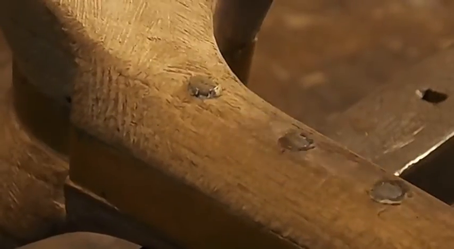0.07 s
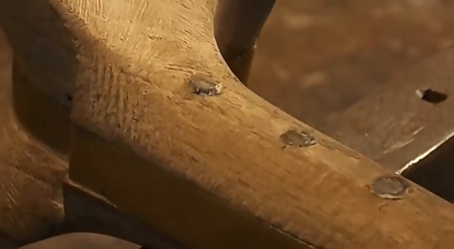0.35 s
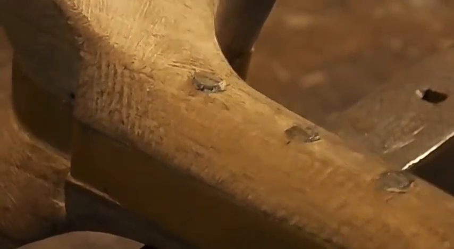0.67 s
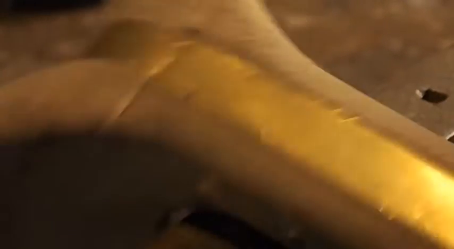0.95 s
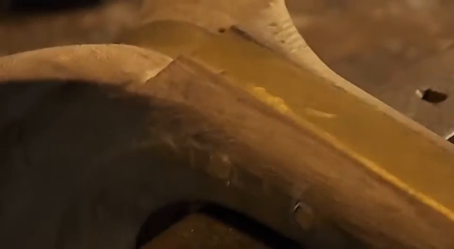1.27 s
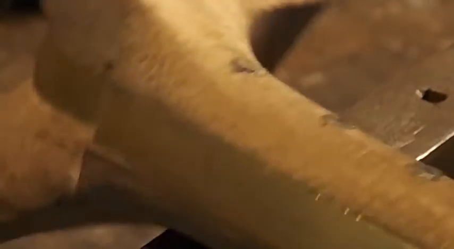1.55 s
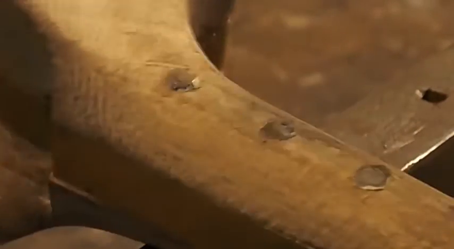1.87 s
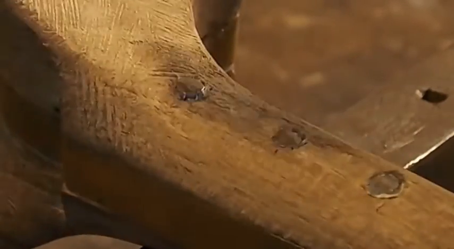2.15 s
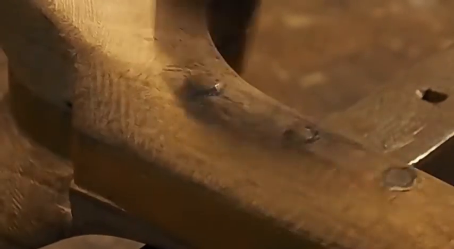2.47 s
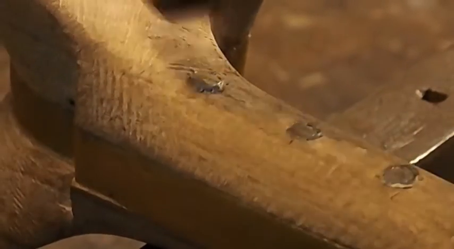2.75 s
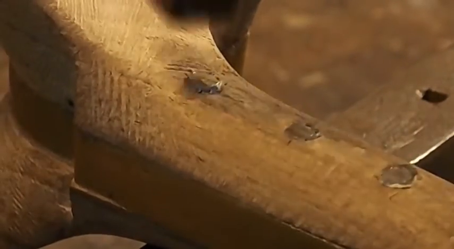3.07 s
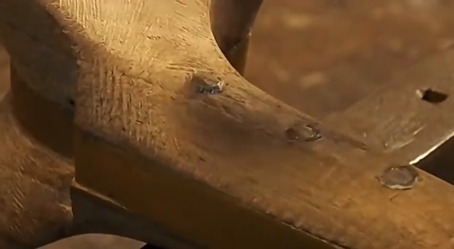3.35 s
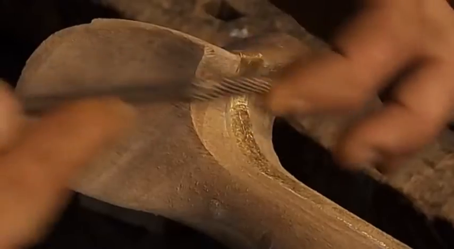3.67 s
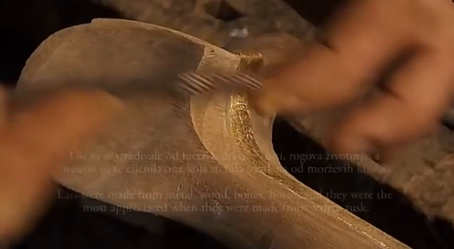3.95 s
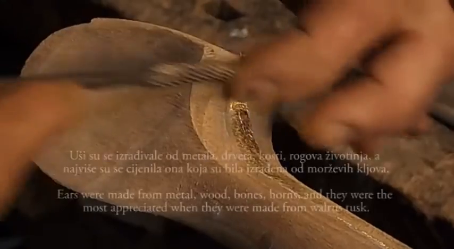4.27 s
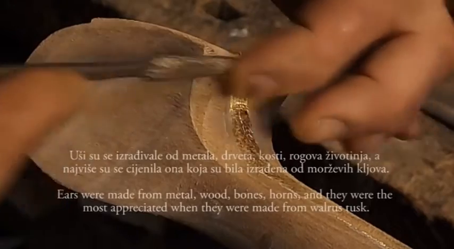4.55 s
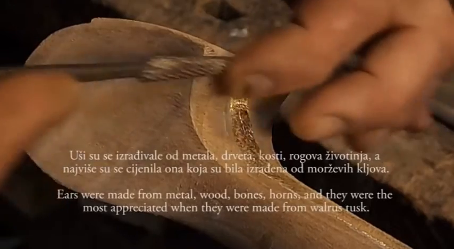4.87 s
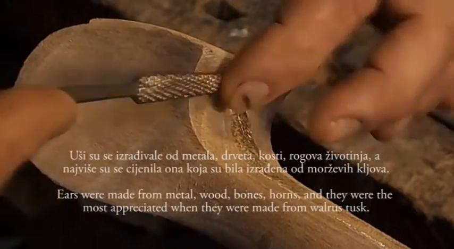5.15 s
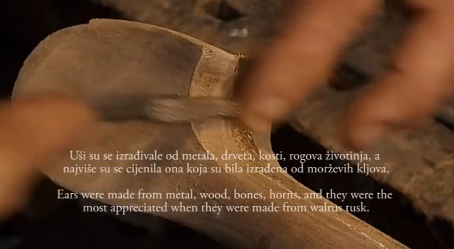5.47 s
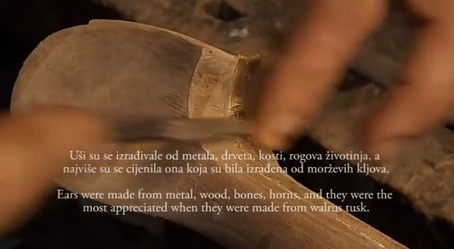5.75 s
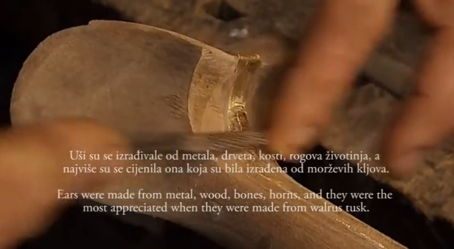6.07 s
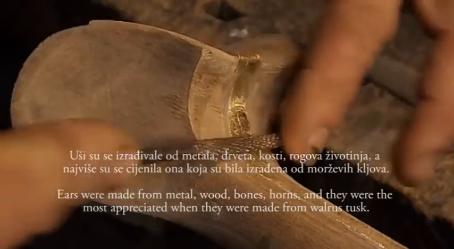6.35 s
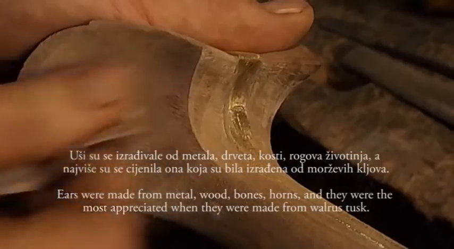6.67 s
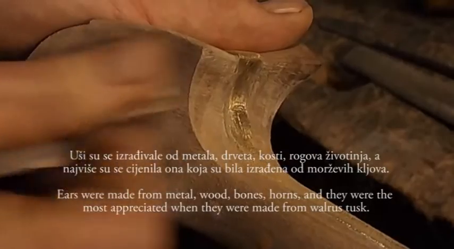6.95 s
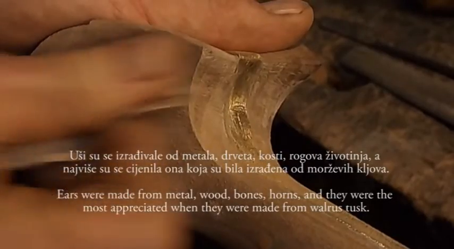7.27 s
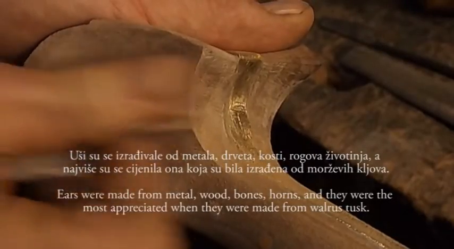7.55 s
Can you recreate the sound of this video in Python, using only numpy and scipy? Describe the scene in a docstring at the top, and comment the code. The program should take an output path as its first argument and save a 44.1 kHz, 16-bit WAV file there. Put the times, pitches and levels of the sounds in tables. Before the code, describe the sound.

In a small woodshop, a hammer strikes nails in two hard bouts, followed by soft rasp strokes and brisk, hissing sandpaper.

```python
"""A woodworker's shop. Hard hammer blows on nails in wood fill the small room and drive a limiter,
which turns the loudest moments down. Between the two bouts the piece is turned over on the bench.
The hammering is cut off, then a small rasp runs lightly to and fro: its teeth tear fibres and the
held wood drones. Last come quicker, brighter strokes of sandpaper, whose grit hisses and whistles."""
import sys
import numpy as np
from scipy import signal
from scipy.fft import rfft, irfft, next_fast_len
from scipy.io import wavfile
from scipy.ndimage import uniform_filter1d, minimum_filter1d, map_coordinates

SR = 44100
rng = np.random.default_rng(int(sys.argv[2]) if len(sys.argv) > 2 else 0)


def transcribe(u):
    """Save the signal u as a 16-bit wav file named by the first command-line argument.

    u: samples, shape (n,) or (channels, n), limited to [-1, 1]; the rate is SR.
    q: integer samples, one column per channel.
    """
    v = np.clip(np.atleast_2d(u).T, -1, 1)
    q = np.round(v * 32767).astype(np.int16)
    wavfile.write(sys.argv[1], SR, q)


N = 339570

HAMMER_END_S, RASP_END_S = 3.487, 6.73


# The tone of steel meeting the nail. Each row: frequency in Hz, level in dB.
CRACK_TONE = [(30, -32), (170, -16.5), (650, -12), (1700, -7), (2150, -11.5), (2650, 2.5), (3900, 6.5),
              (5200, -13.5), (9000, -3.5), (12000, -8), (16000, -11)]
# The hammer blows. Each row: start in seconds, force in dB, extra level of the crack in dB.
HAMMER_BLOWS = [(-.112, -4.5, 0), (0.1473, -1, -5), (0.409, -0.5, 2), (2.421, -5, -4.5), (2.6747, -2, 3),
                (2.9267, 0, -1.5), (3.18, 0, -2), (3.4321, 0, -3)]

def hammer():
    """A short crack, then after a few milliseconds the bang of bench and room, nearly alike each time."""
    out, t = np.zeros(N), np.arange(SR) / SR
    shared_bang = room_bang()
    contact = coloured(rng.standard_normal(SR), CRACK_TONE)
    arrival = np.interp(t, [0, .004, .006], [.3, .45, 1])
    for start, force_db, crack_db in HAMMER_BLOWS:
        bang = amp(-9) * shared_bang + amp(-13.5) * room_bang() + ringing(t)
        crack = amp(crack_db + 3.5) * contact * np.exp(-(t / 0.0018) ** 2)
        add(out, amp(force_db) * (bang * arrival + crack), start)
    cut_off = np.clip((HAMMER_END_S - clock()) / 0.0024, 0, 1)
    return out * cut_off


# The tone of the struck piece and bench in the room. Each row: frequency in Hz, level in dB.
BANG_TONE = [(30, -52.5), (138, -34), (239, -20.5), (295, -17.5), (486, -2), (684, -6.5), (1130, -4.5),
             (1590, -10.5), (2290, -9), (2900, -13.5), (4800, -13.5), (6210, -23.5), (8700, -12.5),
             (10500, -21.5), (13000, -15.5), (16000, -28)]
# How long the shop echoes. Each row: frequency in Hz, seconds to fade by 60 dB.
ECHO_TIMES = [(60, 0.78), (160, 0.61), (420, 0.47), (1100, 0.47), (2900, 0.42), (7700, 0.34), (15000, 0.23)]

def room_bang():
    """One second of the room's answer to a blow; the treble dies first."""
    hz, t, spectrum = signal.stft(coloured(rng.standard_normal(SR), BANG_TONE), SR, nperseg=512)
    fade = amp(-60 * t / along(ECHO_TIMES, hz)[:, None])
    return signal.istft(spectrum * fade, SR, nperseg=512)[1][:SR]


# The notes of the struck wood and nail. Each row: pitch in Hz, relative level in dB.
STRUCK_NOTES = [(246, -17), (379, -10), (486, -2.5), (540, -5), (735, -2), (924, -8.5), (1002, -7.5),
                (1106, 0), (1168, 1.5), (1330, -9.5), (1394, -2), (1992, -9), (2032, -10.5), (2228, -6),
                (2275, -2), (2490, -8.5), (2760, -4.5), (3019, -12.5), (3411, -5.5), (3930, -9),
                (4468, -12), (4838, -8), (8387, -19.5), (9540, -16)]

def ringing(t):
    """The steel head gives a thin note; wood and nail ring on in the room, blurred by its echoes."""
    head_hz, head_fade_s = 13708, .62
    out = amp(-41 - 60 * t / head_fade_s) * np.sin(2 * np.pi * head_hz * t)
    drift_times = np.arange(101) / 100
    for hz, db in STRUCK_NOTES:
        phases = rng.uniform(0, 2 * np.pi) + np.cumsum(rng.normal(0, 0.46, len(drift_times)))
        level = amp(db - 20 + rng.normal(0, 1.1) - 60 * t / along(ECHO_TIMES, hz))
        out += level * np.sin(2 * np.pi * hz * t + np.interp(t, drift_times, phases))
    return out


# The rasp going to and fro. Each row: start in seconds, pull level in dB, push level in dB.
RASP_STROKES = [(3.478, -50, -50), (3.787, -53.5, -47), (4.126, -62, -49.5), (4.44, -56.5, -55),
                (4.759, -54.5, -52), (5.103, -52, -47), (5.452, -56.5, -50), (5.774, -55, -56),
                (6.108, -53, -56), (6.428, -54.5, -54)]
# The tone of the scraping. Each row: frequency in Hz, level in dB.
RASP_TONE = [(100, -38), (280, -31.5), (450, -10), (650, -10.5), (850, -0.5), (1300, -6.5), (2300, -2.5),
             (3500, -5.5), (5000, -11), (5900, -11.5), (8000, -10), (11000, -13.5), (16000, -14.5)]
# The notes that ring in the scraping. Each row: pitch in Hz, width in Hz, level in dB.
RASP_NOTES = [(527, 27, -2), (792, 14, -4.5), (887, 17, 3), (1107, 20, 4.5), (1554, 75, -5.5),
              (1804, 21, 0.5), (2055, 27, -4), (2300, 28, -7.5), (4700, 430, -14.5), (7000, 340, -16.5),
              (7930, 180, -12)]

def rasp():
    """Teeth tear fibres as fast as the hand moves, and sound duller on the push."""
    t = clock()
    starts, pull_db, push_db = np.transpose(RASP_STROKES)
    speed, moments = strokes(starts, RASP_END_S, swing=(0.23, 0.51, 0.75))
    stroke_db = by_stroke(moments, pull_db, push_db)
    easing_db = 2.5 * (t - starts[0])  # the hiss falls as the hand eases
    teeth_db = -49 - easing_db - 2.5 * by_stroke(moments, 0, 1)
    bite = scratches(500 + 3500 * speed, spread_db=3.5, hiss_db=0.5) * amp(0.83 * wobble(60))
    voiced = coloured(bite, RASP_TONE) + amp(-3.5) * resonate(bite, RASP_NOTES)
    low, high = split(wood_grain(voiced, depth_db=2.5), edge_hz=2300)
    scrape = amp(stroke_db) * low * (.12 + 0.88 * speed ** 1.08) + amp(teeth_db) * high * speed ** 1.47
    drone = wood_drone(bite, speed, stroke_db, average_db=np.mean([pull_db, push_db]))
    working = (t > HAMMER_END_S) * np.clip((RASP_END_S - t) / .03, 0, 1)
    return (in_room(working * scrape, wet_db=-7, lowest_hz=258)
            + in_room(working * drone, wet_db=-15.5, lowest_hz=90))


# The low notes of the held piece. Each row: pitch in Hz, width in Hz, level in dB.
HELD_WOOD_NOTES = [(118, 18, -12.5), (338.6, 9, 2), (360.2, 7.3, 8.5), (413.5, 8, -11), (523, 6.3, -19)]

def wood_drone(bite, speed, stroke_db, average_db):
    """The held piece hums under the rasp; a firm stroke also brings out its upper notes."""
    body = resonate(rng.standard_normal(N), HELD_WOOD_NOTES)
    damped = np.clip((clock() - 5.3) / 0.27 + .5, 0, 1)  # the hum is damped late in the bout
    hum_db = -60.5 + 0.42 * (stroke_db - average_db) - 4 * damped
    hum = amp(hum_db) * (0.67 + 0.5 * speed) * body
    return hum + amp(stroke_db - 10.5) * speed * resonate(bite, HELD_WOOD_NOTES[3:])


# The tone of grit on wood. Each row: frequency in Hz, level in dB.
SANDING_TONE = [(100, -49), (260, -23), (353, -20), (509, -11), (777, -14), (1200, -10), (1500, -5.5),
                (1900, -5.5), (2800, -2.5), (4500, -3), (5300, -4), (6200, -2.5), (8270, -2.5), (11500, -7),
                (16000, -10.5)]

def sandpaper():
    """Dense grit rubs and hisses to a steady beat, brighter with speed, louder as the hand leans in."""
    start_s, cycle_s = 6.692, 0.3072
    starts = start_s + cycle_s * np.arange(4)
    speed, moments = strokes(starts, starts[-1] + cycle_s, swing=(.295, .48, 0.68))
    age = np.maximum(clock() - start_s, 0)
    back = by_stroke(moments, 0, 0.84)  # high on the way back
    rub = amp(-40 + 3.5 * age + 2.5 * back)
    hiss = amp(-35 + age - 2.5 * back)
    grit = scratches(2000 + 9000 * speed, spread_db=4, hiss_db=3) * amp(0.76 * wobble(90))
    low, high = split(wood_grain(coloured(grit, SANDING_TONE), depth_db=2), edge_hz=2300)
    out = rub * low * speed ** 0.25 + hiss * high * speed ** 1.54
    out += amp(-27.5) * rub * speed ** .5 * resonate(grit, HELD_WOOD_NOTES[1:])
    out += amp(-33 + 6 * age - 5.5 * back) * paper_whistle(speed, turns=moments[:, 2:3])
    return in_room(out, wet_db=-10.5, lowest_hz=228)


def paper_whistle(speed, turns):
    """Just before and after each far turn the paper grips with a rough whistle, higher when faster."""
    offset_s, half_length_s = 0.043, 0.015
    slow_hz, fast_hz = 2484, 3740
    from_turn = np.abs(clock() - turns).min(axis=0)
    grip = np.exp(-.5 * ((from_turn - offset_s) / half_length_s) ** 2)
    pitch = slow_hz + (fast_hz - slow_hz) * speed
    flutter = unit(filtered(rng.standard_normal(N), lambda f: 1 / (1 + (f / 380) ** 2)))
    return grip * flutter * np.sin(2 * np.pi * np.cumsum(pitch) / SR)


def strokes(starts, end_s, swing):
    """Hand speed from 0 to 1, and each to-and-fro's moments: start, fastest out, turn, fastest back."""
    lengths = np.diff(starts, append=end_s)
    moments = starts[:, None] + lengths[:, None] * np.array([0, *swing])  # swing: shares of the length
    marks = np.append(moments, end_s)
    quarters = np.interp(clock(), marks, np.arange(len(marks)))
    return np.abs(np.sin(np.pi / 2 * quarters)), moments


def by_stroke(moments, out, back):
    """A value that glides from stroke to stroke, reached where the hand is fastest."""
    fastest = moments[:, 1::2]
    levels = np.broadcast_to(np.transpose([out, back]), fastest.shape)
    return np.interp(clock(), fastest.ravel(), levels.ravel())


def scratches(per_second, spread_db, hiss_db):
    """Tiny fibre breaks of uneven size on a smooth hiss."""
    happens = rng.random(N) < per_second / SR
    breaks = happens * rng.standard_normal(N) * amp(spread_db * rng.standard_normal(N))
    return unit(breaks / np.sqrt(per_second.max() / SR) + amp(hiss_db) * rng.standard_normal(N))


def wood_grain(x, depth_db):
    """The tone shifts as the tool moves over the grain."""
    spectrum = signal.stft(x, nperseg=512)[2]
    patches = uniform_filter1d(rng.standard_normal(spectrum.shape), size=6, axis=0)
    patches = uniform_filter1d(patches, size=14, axis=1)
    return unit(signal.istft(spectrum * amp(depth_db * unit(patches)), nperseg=512)[1][:N])


# The piece is set down. Each row: start in seconds, level in dB, pitch in Hz, echo time in seconds.
BENCH_KNOCKS = [(0.976, -46, 427, 0.42), (1.247, -46, 560, 0.34)]
# Hands and wood slide. Each row: middle and half length in seconds, level in dB, pitch in Hz.
HAND_SLIDES = [(0.76, 0.058, -60.5, 7800), (0.923, 0.046, -58.5, 6940), (1.374, 0.018, -56, 6300),
               (1.469, .07, -69, 4000), (1.635, .025, -63, 1412), (1.79, 0.054, -58, 700),
               (1.807, .04, -63, 2480), (1.916, 0.048, -68, 1000)]

def turning_the_piece():
    """The piece slides in the hands and bumps dully on the bench: a short thud, then the room."""
    out, t = np.zeros(N), clock()
    for start, db, hz, echo_s in BENCH_KNOCKS:
        age = np.maximum(t - start, 0)
        rise = 1 - np.exp(-(age / 0.0022) ** 2)
        fade = amp(-60 * age / 0.03) + amp(-2) * amp(-60 * age / echo_s)
        out += amp(db) * rise * fade * band(hz, octaves=0.6)
    for middle, half_length, db, hz in HAND_SLIDES:
        out += amp(db) * np.exp(-.5 * ((t - middle) / half_length) ** 2) * band(hz, octaves=1)
    return out


def in_room(x, wet_db, lowest_hz):
    """A small, close source: little bass, and some of the shop's echo behind it."""
    t = np.arange(SR // 2) / SR
    tail = rng.standard_normal(len(t)) * amp(-60 * t / along(ECHO_TIMES, 2000))
    x = filtered(x, lambda f: f ** 3 / (f ** 3 + lowest_hz ** 3))
    return x + amp(wet_db) * signal.fftconvolve(x, tail / np.linalg.norm(tail))[:N]


# The tone of the quiet shop. Each row: frequency in Hz, relative level in dB.
AIR_TONE = [(15, -38), (25, -25), (55, -18), (102, -19), (170, -12), (285, -10), (600, -3.5), (1000, -5),
            (1840, -10), (2480, -11.5), (16000, -19)]

def shop_air():
    """A faint, steady hush."""
    return amp(-63.5) * coloured(rng.standard_normal(N), AIR_TONE)


def amp(db):
    """Decibels to gain."""
    return 10 ** (np.asarray(db) / 20)


def unit(x):
    """Scaled to rms 1."""
    return x / np.sqrt(np.mean(x ** 2) + 1e-20)


def clock():
    """The time of every sample."""
    return np.arange(N) / SR


def along(points, hz):
    """(Hz, value) points on a log axis."""
    f, v = np.transpose(points)
    return np.interp(np.log(hz + 1), np.log(f + 1), v)


def filtered(x, response):
    """x times a response of frequency."""
    m = next_fast_len(len(x) + 8192)
    return irfft(rfft(x, m) * response(np.fft.rfftfreq(m, 1 / SR)), m)[:len(x)]


def coloured(x, spectrum):
    """x with a (Hz, dB) colour, at rms 1."""
    return unit(filtered(x, lambda f: amp(along(spectrum, f))))


def resonate(x, modes):
    """x through (Hz, width, dB) resonances, at rms 1."""
    return unit(filtered(x, lambda f: sum(amp(db) * 1j * f * w / (c * c - f * f + 1j * f * w)
                                          for c, w, db in modes)))


def band(centre_hz, octaves):
    """Noise in a bell-shaped band."""
    return unit(filtered(rng.standard_normal(N),
                         lambda f: np.exp(-.5 * (np.log2((f + 1) / centre_hz) / octaves) ** 2)))


def wobble(rate):
    """A smooth random curve, rate knots a second."""
    return map_coordinates(rng.standard_normal(int(N * rate / SR) + 4), [clock() * rate])


def add(track, sound, s):
    """Mix a sound into the track from time s on."""
    at = round(s * SR)
    part = sound[max(-at, 0):N - at]
    track[max(at, 0):][:len(part)] += part


def split(x, edge_hz):
    """The parts of x below and above a soft edge."""
    low = filtered(x, lambda f: 1 / (1 + (f / edge_hz) ** 4))
    return low, x - low


def scene():
    """All the work over the quiet air of the shop."""
    return (shop_air() + hammer() + turning_the_piece() + rasp() + sandpaper())[None]


def record(dry):
    """A fast limiter flattens the start of each blow; deep bass and the highest treble are cut."""
    limit_db, bass_cut_hz, top_hz = -11.5, 75, 16100
    x = dry[0]
    level = np.sqrt(np.abs(uniform_filter1d(x ** 2, size=353)))
    gain = np.minimum(1, amp(limit_db) / (level + 1e-9))
    x = x * uniform_filter1d(minimum_filter1d(gain, size=221), size=221)
    x = x / (1 + (x / .92) ** 6) ** (1 / 6)  # rounds off the tips of the crack
    x = filtered(x, lambda f: 1j * f / (1j * f + bass_cut_hz))
    return filtered(x, lambda f: np.clip((top_hz - f) / 500, 0, 1))[None]


dry = scene()
out = record(dry)
transcribe(out)
```